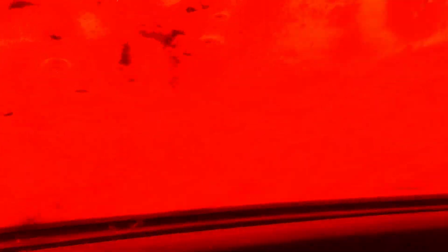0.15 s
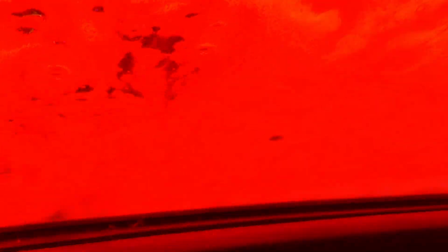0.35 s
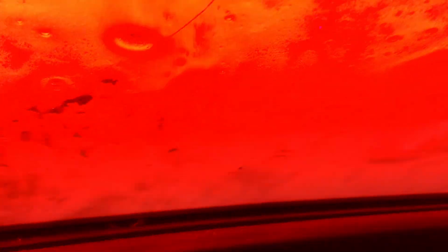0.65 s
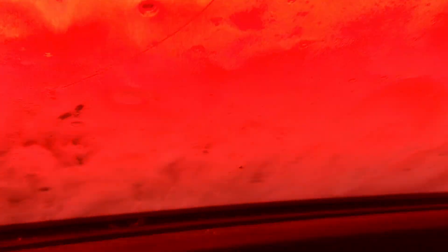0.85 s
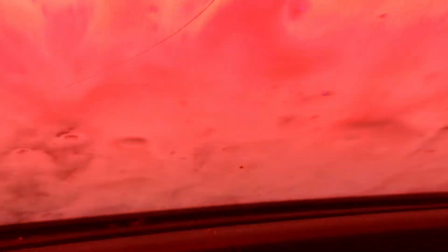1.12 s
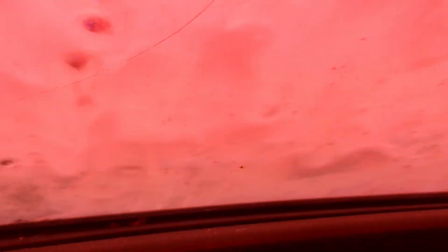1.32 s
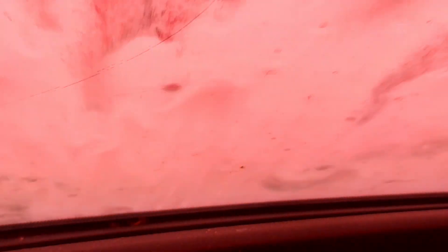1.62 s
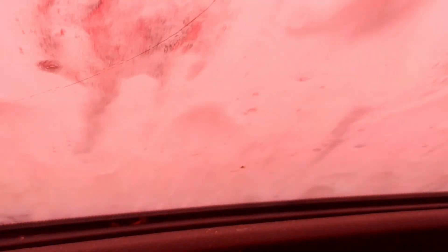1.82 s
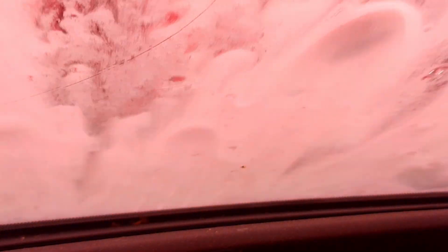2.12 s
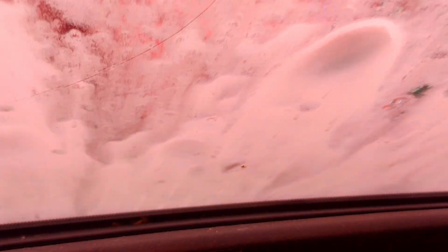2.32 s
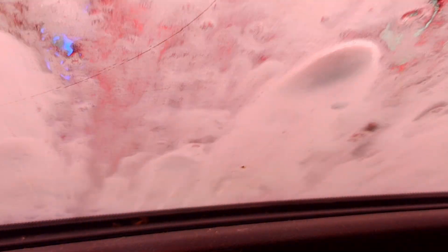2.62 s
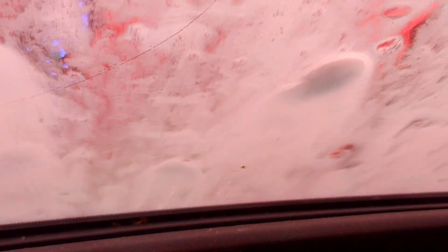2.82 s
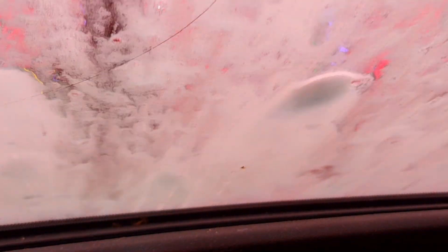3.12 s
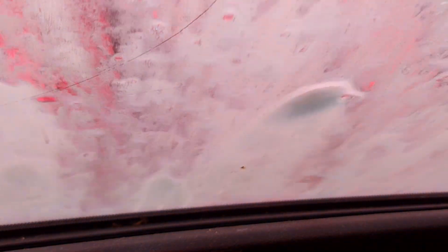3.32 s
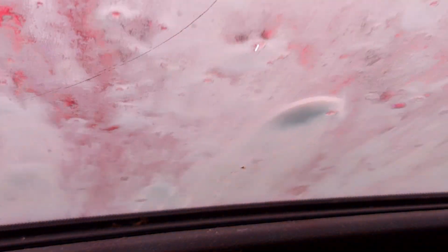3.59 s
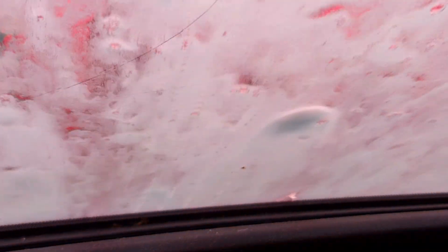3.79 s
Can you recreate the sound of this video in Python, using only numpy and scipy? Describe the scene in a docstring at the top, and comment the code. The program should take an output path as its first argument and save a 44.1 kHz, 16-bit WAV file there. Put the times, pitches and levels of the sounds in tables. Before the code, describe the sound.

Car wash spray and foam patter on a windscreen over steady low machinery rumble inside the car

```python
"""Inside a car wash

We sit in a closed car in a tunnel wash: shaped noise rumbles through the body and two wavering tones hum.
Hissing noise with a flickering level is spray on the windscreen; an airy mist layer thins out halfway.
The jets drum, rush and buffet as bands of noise that build up after the first third or so.
Drops are short noise bursts, a ringing knock plus a sharp tick, mostly to the left."""
import sys
import numpy as np
from scipy import signal
from scipy.fft import rfft, irfft
from scipy.io import wavfile
from scipy.ndimage import uniform_filter1d

SR = 44100
rng = np.random.default_rng(int(sys.argv[2]) if len(sys.argv) > 2 else 0)


def generate_wav(signal):
    """Clip the signal to [-1, 1] and save it as 16-bit WAV at the path in sys.argv[1]."""
    frames = np.transpose(np.atleast_2d(signal))
    scaled = np.clip(frames, -1, 1) * 32767
    pcm = np.round(scaled).astype(np.int16)
    wavfile.write(sys.argv[1], SR, pcm)


N = 174195
TIME = np.arange(N) / SR

# Spectra give a balance only: each layer is scaled before its level is set.
# Levels are those ahead of the microphone ports.

# jets drumming on the roof and bonnet: f/Hz, balance/dB per Hz
DRUMMING_SPECTRUM = [(70, -14.5), (115, -7), (145, -1), (175, 2), (235, -3.5), (290, -5), (350, -12),
                     (700, -22.5), (1500, -34), (4000, -65)]
# drumming: t/s, level/dB
DRUMMING_LEVEL = [(0, -72), (1.38, -56), (1.53, -40.5), (1.9, -43.5), (2.3, -42.5), (2.8, -41),
                  (3.3, -41.5), (3.6, -41), (3.95, -44.5)]
DRUMMING_SURGE_DB = 1.3  # rms
# sheets of water rushing over the body: f/Hz, balance/dB per Hz
RUSH_SPECTRUM = [(35, -8), (72, 7.5), (95, 2), (200, -10.5), (350, 1), (500, -5), (750, -14.5), (1100, -34),
                 (3000, -44)]
# rush: t/s, level/dB
RUSH_LEVEL = [(0, -56.5), (2.3, -53.5), (2.68, -52.5), (2.83, -45), (3.08, -59), (3.22, -40), (3.45, -47.5),
              (3.62, -43.5), (3.78, -40), (3.95, -45)]
# the body rocking under the jets: f/Hz, balance/dB per Hz
BUFFET_SPECTRUM = [(6, -31), (16, 7.5), (25, -3), (39, 1.5), (50, -16), (90, -22), (300, -85)]
# buffeting: t/s, level/dB
BUFFET_LEVEL = [(0, -51.5), (1.3, -46), (1.85, -49.5), (2.05, -39.5), (2.16, -45), (2.42, -42),
                (2.6, -46.5), (2.72, -41), (2.82, -45), (2.97, -39.5), (3.08, -42), (3.15, -44),
                (3.28, -38), (3.55, -46.5), (3.7, -44), (3.95, -40.5)]

# large drops: t/s, knock level/dB, sharp tick level/dB, pitch of the glass f/Hz
LARGE_DROPS = [ (1.203, -46, -67, 2450), (1.358, -48, -70, 3490), (1.499, -49, -55, 4690),
               (1.604, -41, -53, 4650), (1.926, -39, -47.5, 2500), (1.985, -48, -49.5, 3000),
               (2, -47, -45.5, 2370), (2.117, -55, -46, 3320), (2.1324, -48, -48, 1610),
               (2.1578, -44, -37.5, 3490), (2.2428, -44, -39.5, 3320), (2.2264, -47, -50, 2550),
               (2.298, -46, -54, 2320), (2.307, -43, -47, 2370), (2.324, -49, -51, 2200),
               (2.386, -38.5, -69, 3600), (2.542, -51, -54, 2200), (2.6808, -40, -62, 3000),
               (2.702, -46, -47, 2930), (2.7342, -45, -57, 1630), (2.7724, -45, -62, 3400),
               (2.7995, -42.5, -57, 2690), (2.8074, -39.5, -66, 2690), (2.8644, -39, -68, 2160),
               (2.8993, -41, -64, 1940), (2.933, -44, -64, 2100), (2.958, -40, -53, 4050),
               (3.0074, -45, -60, 1670), (3.037, -43, -55, 3100), (3.159, -41, -53, 2700),
               (3.1952, -39.5, -54, 1980), (3.204, -46, -38.5, 1940), (3.3622, -48, -40.5, 2280),
               (3.2296, -37.5, -53, 3200), (3.2708, -40, -51, 3000), (3.2953, -42, -48.5, 2760),
               (3.3354, -45, -58, 2070), (3.3866, -41.5, -58, 2540), (3.4266, -38, -52, 2800),
               (3.442, -42.5, -53, 1940), (3.4785, -44, -62, 1660), (3.5239, -44, -54, 2540),
               (3.599, -45, -54, 3190), (3.6592, -34, -45.5, 3950)]
# dull part of a drop: f/Hz, balance/dB per Hz
KNOCK_SPECTRUM = [(150, 6.5), (600, 4), (1500, -3), (2100, -1.5), (4200, -3), (6500, -9), (14000, -29)]
# sharp part of a drop: f/Hz, balance/dB per Hz
TICK_SPECTRUM = [(2000, -30), (6500, -15), (8200, -5), (9250, 1), (10300, -7), (14000, -9)]
# ticks of large drops move from the left towards the middle: t/s, lean to the left/dB
TICK_SIDE = [(2.3, 6), (2.7, 3.5)]
# a lean raises the left and lowers the right by this much
KNOCK_LEFT_DB = 1.5
# the ring's peak gain grows with pitch
RING_DB_PER_HZ, RING_WIDTH_HZ = .0039, 400
RISE_S, KNOCK_DECAY_S, TICK_DECAY_S = .0011, .003, .002
CABIN_DECAY_S, CABIN_DB = .012, -23
SPLASH_S, SPLASH_DB = .022, -17  # latest droplet, and its level against the main drop

# fine spray on the glass: f/Hz, balance/dB per Hz
SPRAY_SPECTRUM = [(200, -14), (700, -9.5), (1400, -0.5), (2100, -4.5), (3000, -1), (4100, -4.5), (5000, -8),
                  (6500, -10.5), (10000, -9), (14000, -9.5)]
# spray: t/s, level/dB
SPRAY_LEVEL = [(0, -52.5), (.2, -53), (.45, -56), (.9, -56), (1.5, -53.5), (1.85, -51.5), (2.3, -49.5),
               (2.55, -52.5), (3.0, -52), (3.95, -53)]
SPRAY_FLICKER_DB, SPRAY_PATCHY_DB = 1.5, 2  # rms
SPRAY_PATCH_HZ, SPRAY_PATCH_S = 220, .06

# small drops: t/s, level/dB
PATTER_LEVEL = [(0, -68), (.8, -66), (1.3, -65), (1.8, -77), (2.3, -55.5), (2.55, -59.5), (2.9, -65),
                (3.4, -50), (3.6, -58.5), (3.95, -54)]
PATTER_PER_S, PATTER_SPREAD_DB = 130, 2.5
# loudest tick against the knock, mean drop below that, lean of the tick to the left
PATTER_TICK_DB, PATTER_TICK_SPREAD_DB, PATTER_LEFT_DB = -2, 34, 5

# airy mist: f/Hz, balance/dB per Hz
MIST_SPECTRUM = [(2500, -13), (5000, -14), (7000, -21), (10000, -11), (12000, -9.5), (14000, -14.5)]
# mist: t/s, level/dB
MIST_LEVEL = [(0, -53), (.45, -55.5), (1.0, -58.5), (1.85, -69), (2.0, -82), (2.33, -71), (2.45, -103),
              (3.95, -63)]

# lower humming motor: t/s, level/dB
LOW_HUM_LEVEL = [(0, -61), (.3, -47.5), (.46, -53.5), (.9, -48.5), (1.15, -54.5), (1.5, -50), (2.03, -64.5),
                 (2.2, -43.5), (2.55, -53.5), (3.5, -54.5), (3.75, -48.5), (3.95, -57)]
# higher humming motor: t/s, level/dB
HIGH_HUM_LEVEL = [(0, -75), (.55, -65), (1.65, -52.5), (2.05, -59), (2.7, -66), (3.95, -64)]
HUM_HZ = (468.3, 476)
HUM_WAVER_HZ, HUM_DRIFT_HZ = .8, 6  # rms pitch wander, and how fast it wanders
HUM_FLUTTER = .22  # rms scatter, as a share of the tone, in each of two quadratures

# machinery heard through the body: f/Hz, balance/dB per Hz
RUMBLE_SPECTRUM = [(20, -11), (45, -7), (66, 0.5), (92, -12.5), (120, -0.5), (150, -7), (190, 0), (280, .5),
                   (320, -5), (440, -5.5), (570, -15), (690, -15.5), (880, -21), (950, -18), (1080, -23),
                   (1500, -27.5), (1900, -28), (2800, -38.5), (6000, -59)]
RUMBLE_DB = -38.5

# likeness of left and right in the cabin: f/Hz, correlation/-1 to 1
LIKENESS = [(40, 0.95), (200, 0.97), (290, 0.71), (350, 0.89), (430, 0.053), (550, 0.17), (660, 0.18),
            (850, 0.021), (1080, -0.56), (1400, 0.088), (1650, 0.27), (1850, -0.38), (2150, 0.69),
            (2900, -0.34), (3600, 0.081), (6000, 0.0043)]
# colour of the two microphone ports: f/Hz, left level/dB, right level/dB
PORTS = [(106, 3, 2), (254, -1, -0.94), (370, -1.9, -6.5), (690, -0.2, 1.65), (1280, 4, -0.15),
         (2380, -2, -3.5), (4200, -1.5, -4), (6660, -1.5, -3.5), (7760, 2.5, -4), (8800, 7.5, -6.5),
         (10250, -7, -1.5), (10150, -2, -5.5), (11700, -11, -5), (14000, -13, -11)]
EDGE_HZ = 14400


def amp(db):
    """Decibels to gain."""
    return 10 ** (np.asarray(db) / 20)


def unit(x):
    """Scales to rms 1."""
    return x / np.sqrt(np.mean(abs(x) ** 2) + 1e-20)


def at_hz(table, hz, axis=1):
    """Reads one column of a table on a log-frequency axis."""
    rows = np.array(table)
    return np.interp(np.log(hz + 1), np.log(rows[:, 0] + 1), rows[:, axis])


def level(curve):
    """Gain over time from (t/s, level/dB) points."""
    return amp(np.interp(TIME, *np.transpose(curve)))


def drift(rate_hz):
    """Random motion of rms 1, rolled off above the given rate."""
    hz = np.fft.rfftfreq(N, 1 / SR)
    spectrum = rfft(rng.standard_normal(N))
    return unit(irfft(spectrum / (1 + (hz / rate_hz) ** 2) ** 2, N))


def add(mix, s, sound):
    """Mixes a stereo sound in at time s."""
    part = mix[:, max(round(s * SR), 0):][:, :sound.shape[1]]
    part += sound[:, :part.shape[1]]


def cabin_noise(spectrum):
    """Coloured stereo noise, alike on both sides in the bass and diffuse above."""
    hz = np.fft.rfftfreq(N, 1 / SR)
    left, other = rfft(rng.standard_normal((2, N)))
    same = np.clip(at_hz(LIKENESS, hz), -1, 1)
    right = same * left + np.sqrt(1 - same ** 2) * other
    return unit(irfft(np.array([left, right]) * amp(at_hz(spectrum, hz)), N))


def jets():
    """Jets drum unevenly on the panels, send water rushing over them and buffet the car in deep gusts."""
    surge = amp(DRUMMING_SURGE_DB * drift(rate_hz=16))
    drumming = level(DRUMMING_LEVEL) * surge * cabin_noise(DRUMMING_SPECTRUM)
    rush = level(RUSH_LEVEL) * cabin_noise(RUSH_SPECTRUM)
    buffet = level(BUFFET_LEVEL) * cabin_noise(BUFFET_SPECTRUM)
    return drumming + rush + buffet


def burst(colour_db, decay_s, left_db):
    """A short splash: quick rise, quick decay and a faint tail from the cabin."""
    phases = np.exp(2j * np.pi * rng.random((2, len(colour_db))))
    noise = irfft(phases * amp(colour_db))
    t = np.arange(noise.shape[1]) / SR
    after = np.maximum(t - RISE_S, 0)
    decay = np.exp(-after / decay_s) + amp(CABIN_DB) * np.exp(-after / CABIN_DECAY_S)
    shape = np.minimum(t / RISE_S, 1) * decay
    # restore the energy of the envelope, so a longer burst is not made quieter
    splash = unit(noise * shape) * np.sqrt(np.mean(shape ** 2))
    return splash * amp([[left_db], [-left_db]])


def drop(knock_db, tick_db, pitch_hz, tick_left_db, size=2048):
    """One drop: a damped knock of the glass, ringing more when higher, and a sharp tick of bursting water."""
    hz = np.fft.rfftfreq(size, 1 / SR)
    ring_db = RING_DB_PER_HZ * pitch_hz * np.exp(-.5 * ((hz - pitch_hz) / RING_WIDTH_HZ) ** 2)
    knock = burst(at_hz(KNOCK_SPECTRUM, hz) + ring_db, KNOCK_DECAY_S, KNOCK_LEFT_DB)
    tick = burst(at_hz(TICK_SPECTRUM, hz), TICK_DECAY_S, tick_left_db)
    return amp(knock_db) * knock + amp(tick_db) * tick


def large_drops(count=3):
    """Heavy drops and clots of foam crack on the windscreen; each throws off droplets that land just after."""
    out = np.zeros((2, N))
    for s, knock_db, tick_db, pitch_hz in LARGE_DROPS:
        left_db = np.interp(s, *np.transpose(TICK_SIDE))
        add(out, s, drop(knock_db, tick_db, pitch_hz, left_db))
        for late, pitch in rng.random((count, 2)):
            droplet = drop(knock_db, tick_db, pitch_hz * (.5 + pitch), left_db)
            add(out, s + late * SPLASH_S, amp(SPLASH_DB) * droplet)
    return out


def spray(size=1024):
    """Spray hisses on the glass; its colour shifts in small patches and its level flickers."""
    hz, t, z = signal.stft(cabin_noise(SPRAY_SPECTRUM), SR, nperseg=size)
    patch_bins = max(round(SPRAY_PATCH_HZ / hz[1]), 1)
    patch_frames = max(round(SPRAY_PATCH_S / t[1]), 1)
    # smooth random gains across frequency, then across time
    patches = uniform_filter1d(rng.standard_normal(z.shape[1:]), patch_bins, axis=0)
    patches = unit(uniform_filter1d(patches, patch_frames, axis=1))
    hiss = signal.istft(z * amp(SPRAY_PATCHY_DB * patches), SR, nperseg=size)[1][:, :N]
    flicker = amp(SPRAY_FLICKER_DB * drift(rate_hz=59))
    return level(SPRAY_LEVEL) * flicker * unit(hiss)


def patter(count=24):
    """Small drops of random size land on many spots of the glass, each spot with its own pitch and tick."""
    out = np.zeros((2, N))
    for spot in range(count):
        tick_db = PATTER_TICK_DB - PATTER_TICK_SPREAD_DB * rng.exponential()
        sound = drop(0, tick_db, rng.uniform(1100, 4400), PATTER_LEFT_DB)
        lands = rng.random(N) < PATTER_PER_S / count / SR
        sizes = amp(PATTER_SPREAD_DB * np.minimum(rng.exponential(1, N), 3))
        out += signal.oaconvolve((lands * sizes)[None], sound, axes=1)[:, :N]
    return level(PATTER_LEVEL) * unit(out)


def mist():
    """The finest droplets give an airy hiss that sinks away by the middle and creeps back."""
    return level(MIST_LEVEL) * cabin_noise(MIST_SPECTRUM)


def hum():
    """Two motors of nearly the same pitch swell, fade and beat; the tunnel scatters them to each side."""
    out = np.zeros((2, N))
    for hz, curve in zip(HUM_HZ, (LOW_HUM_LEVEL, HIGH_HUM_LEVEL)):
        pitch_hz = hz + HUM_WAVER_HZ * drift(HUM_DRIFT_HZ)
        turn = np.exp(2j * np.pi * np.cumsum(pitch_hz) / SR)
        for side in out:
            # independent scatter per side wobbles both loudness and phase
            scatter = HUM_FLUTTER * (drift(HUM_DRIFT_HZ) + 1j * drift(HUM_DRIFT_HZ))
            side += level(curve) * unit((turn * (1 + scatter)).real)
    return out


def machinery():
    """Steady rumble of the wash, heard through the body as bass-heavy noise."""
    return amp(RUMBLE_DB) * cabin_noise(RUMBLE_SPECTRUM)


def scene():
    """Everything heard from the front seat."""
    return jets() + large_drops() + spray() + patter() + mist() + hum() + machinery()


def record(dry):
    """Each microphone port adds its own colour; then the band limit."""
    hz = np.fft.rfftfreq(N, 1 / SR)
    port_db = [at_hz(PORTS, hz, axis=1), at_hz(PORTS, hz, axis=2)]
    coloured = irfft(rfft(dry) * amp(port_db), N)
    low_pass = signal.firwin(511, EDGE_HZ, window=("kaiser", 9), fs=SR)
    return signal.oaconvolve(coloured, low_pass[None], "same", axes=1)


dry = scene()
out = record(dry)
generate_wav(out)
```